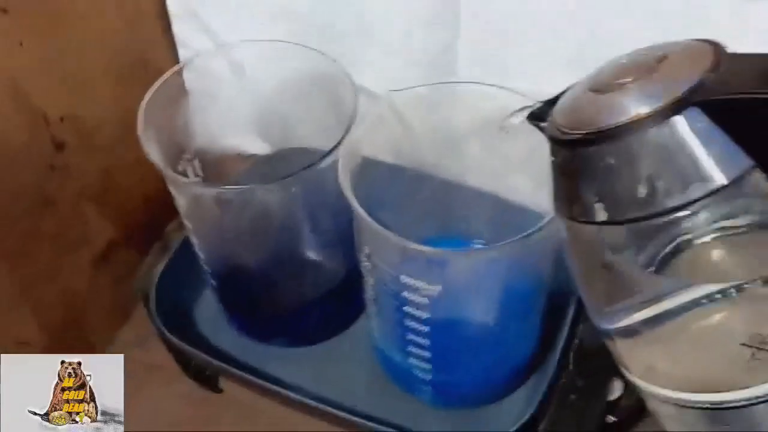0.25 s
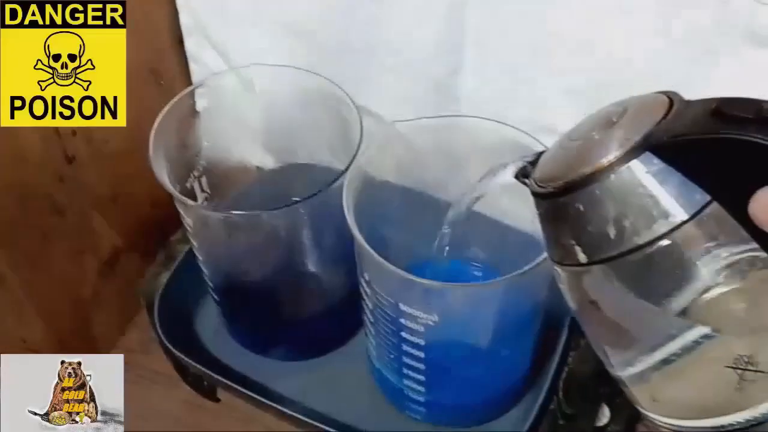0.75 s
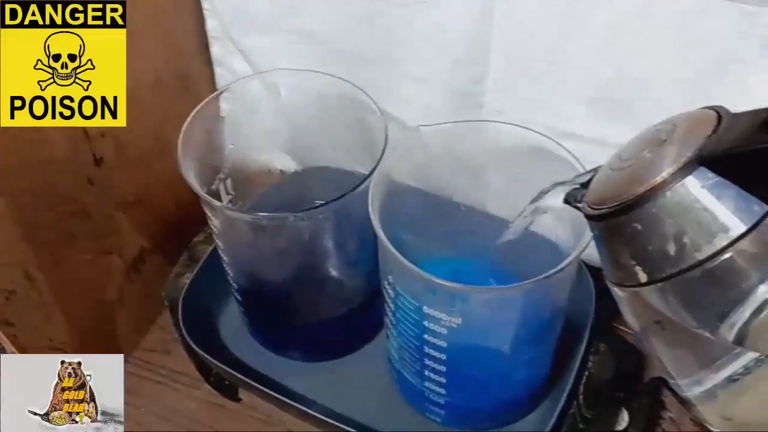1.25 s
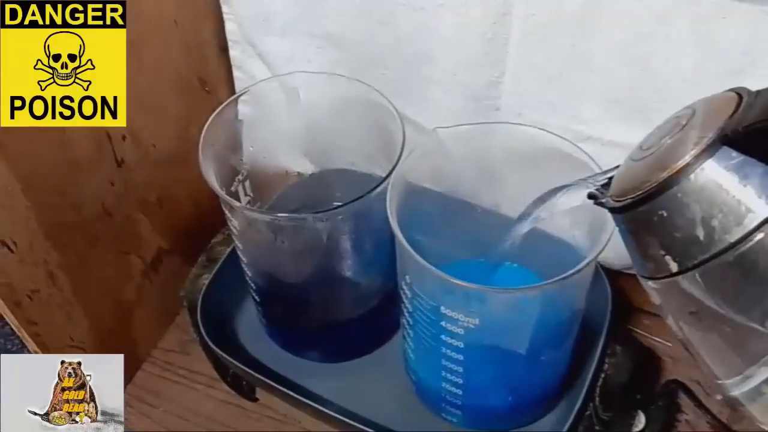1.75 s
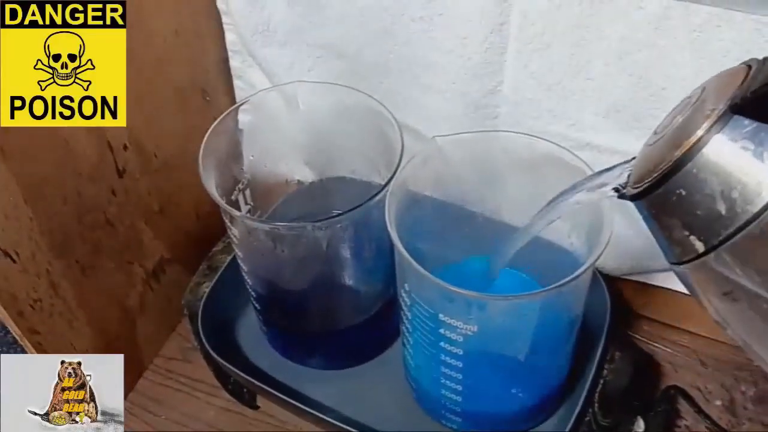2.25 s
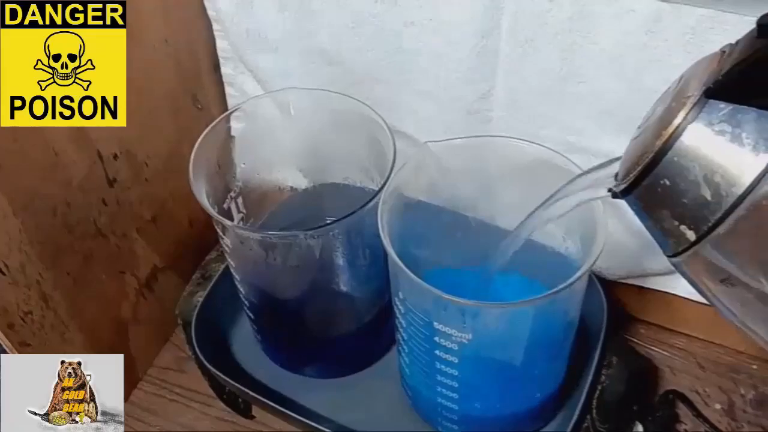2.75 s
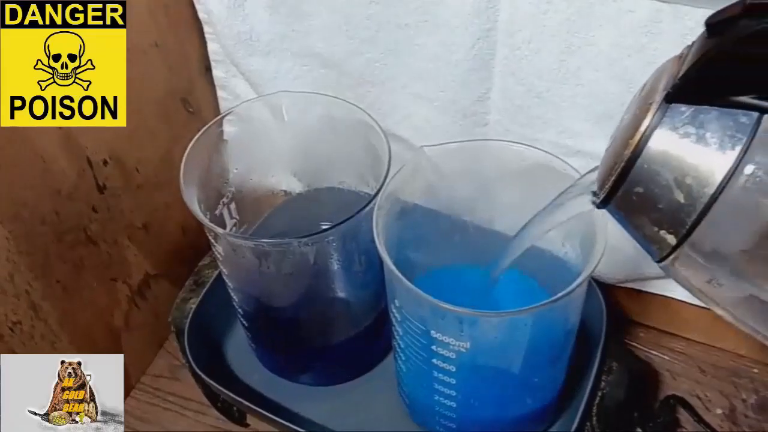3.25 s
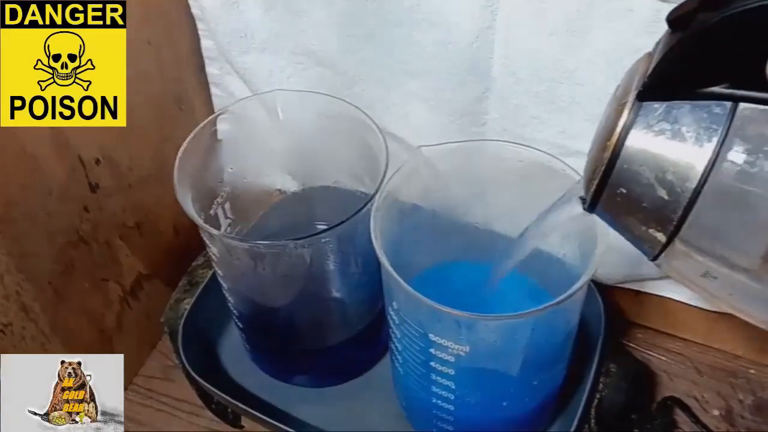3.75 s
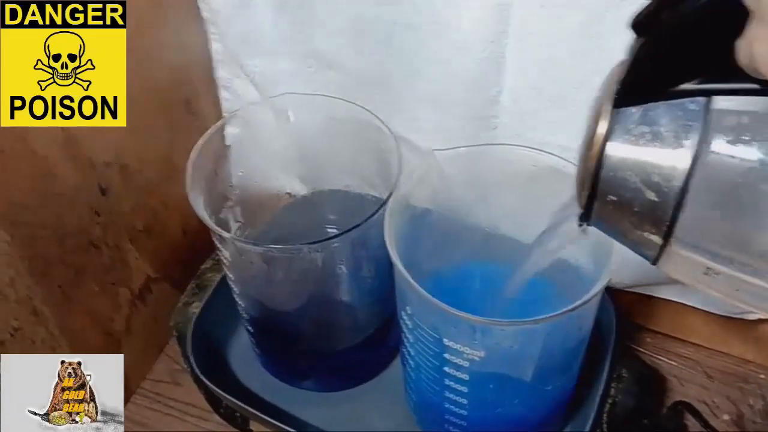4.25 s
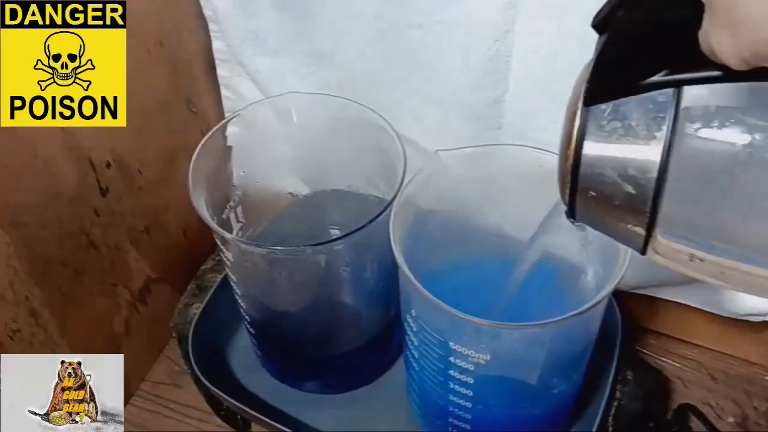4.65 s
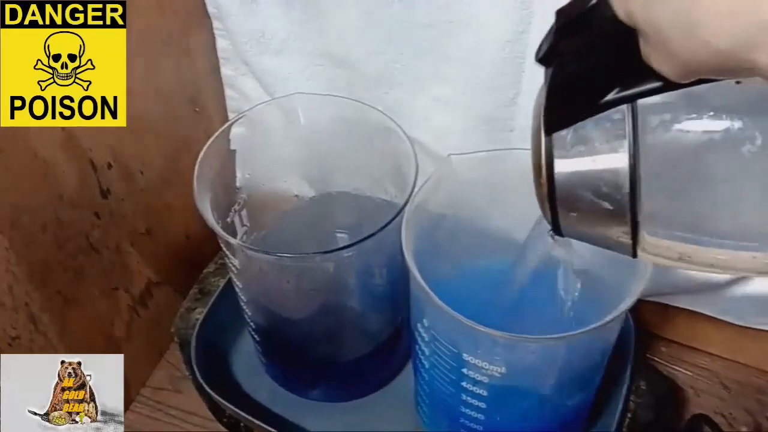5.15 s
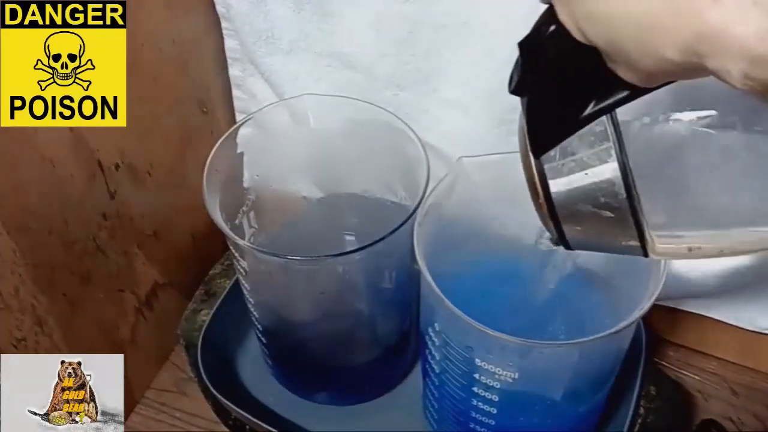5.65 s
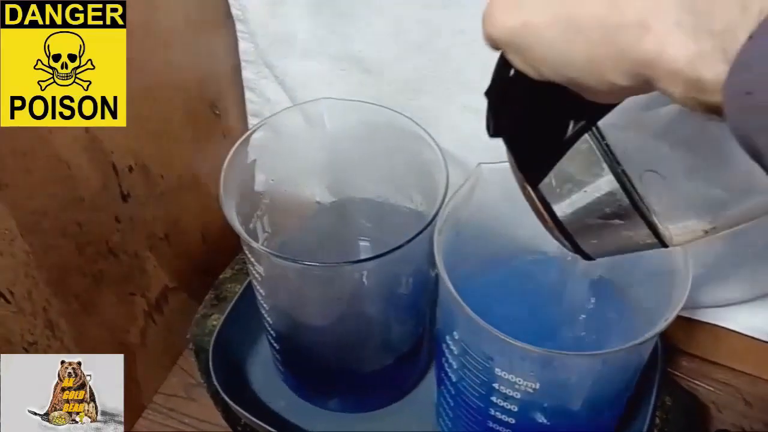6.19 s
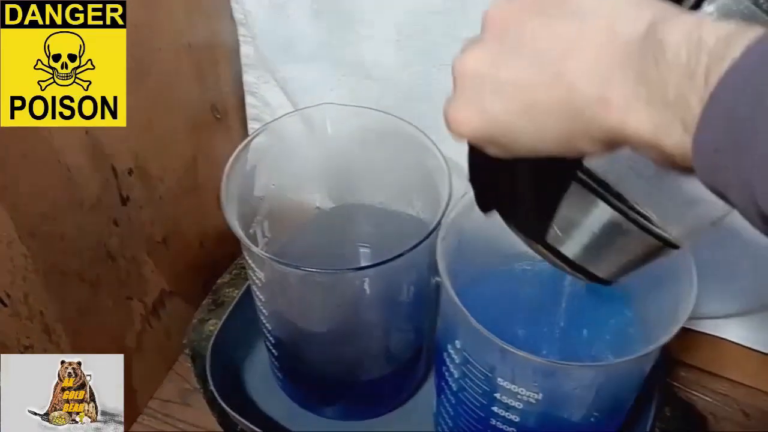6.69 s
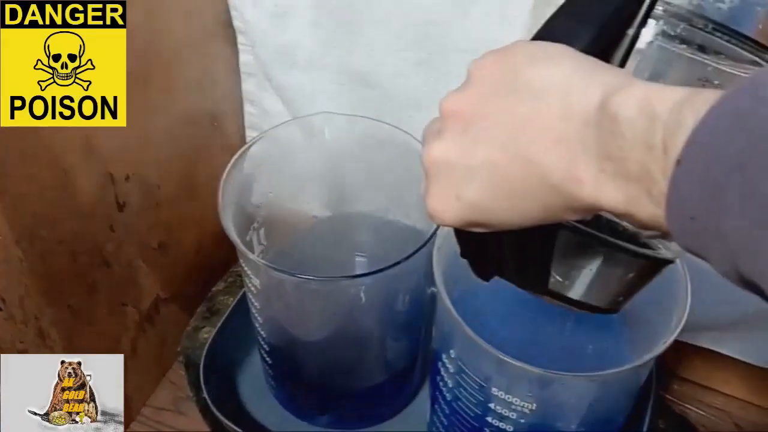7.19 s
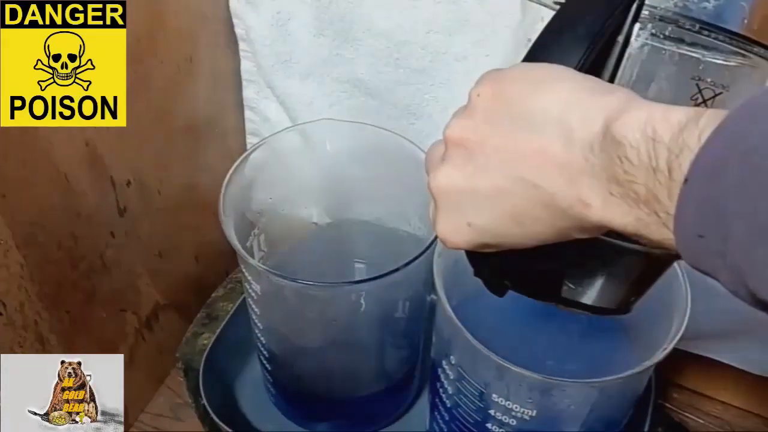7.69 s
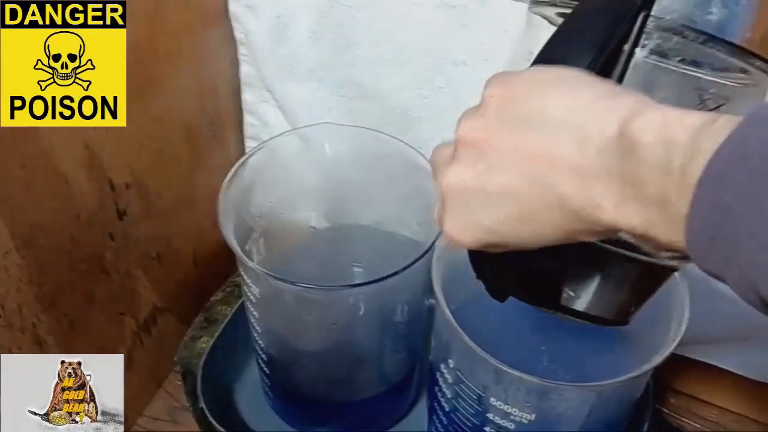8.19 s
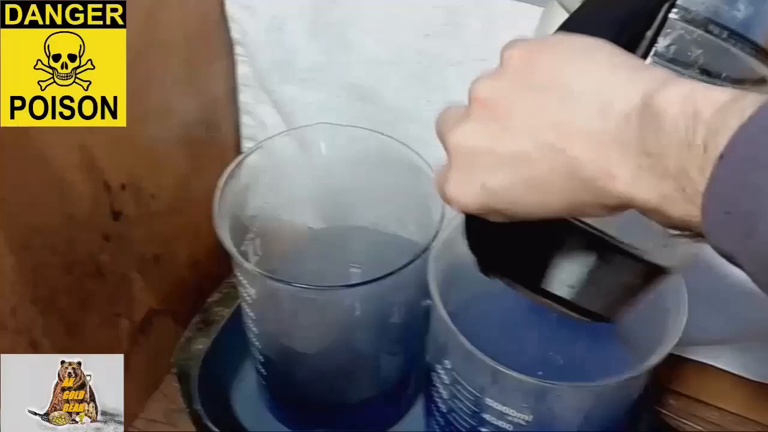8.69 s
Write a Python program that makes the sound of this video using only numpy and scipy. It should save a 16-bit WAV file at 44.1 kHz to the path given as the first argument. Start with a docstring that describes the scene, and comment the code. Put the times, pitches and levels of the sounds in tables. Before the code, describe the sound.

A quiet, soft room hush opens the scene, heard closely in stereo. From about 0.55 seconds a thread of water and several drops slap and ping in a plastic beaker. Near 1.0 the main stream lands with a stronger splash and gulp, then settles into fine crackle, bubbling and low gurgling. At 1.4 a loud, hard kettle clack rattles and rings, with a deep table boom. The pour continues, swelling around 2.8 and 4.5, its hollow resonance gradually rising. A duller double knock strikes at 4.6. Gulps and bright drops crowd together around 6.0 to 6.6; from 6.9 the flow thins quickly into drips and fading fizz. At 7.35 a heavy clack leaves singing steel and a faint wavering hum. A softer, duller knock follows at 8.3, then two extremely faint, thin squeaks around 8.4 to 8.7 over room hush.

```python
"""Pouring hot water into a beaker

Hot water is poured from an electric kettle into a large, part-filled plastic beaker on a tray on a wooden table.
Drops slap and ping first; then the stream crackles, bubbles and gulps, and thins out into a few last drips.
The air above the water is a pair of resonances that climb in pitch as the beaker fills.
The kettle knocks four times: noise rattles its body, its steel rings, and the table booms under it.
Thin squeaks come last. All is heard in a small room by a close pair of microphone ports."""
import sys
import numpy as np
from scipy import signal
from scipy.fft import rfft, irfft
from scipy.io import wavfile

SR = 44100
rng = np.random.default_rng(int(sys.argv[2]) if len(sys.argv) > 2 else 0)


def master_out(mix):
    """Clip the mix to full scale and print it as 16-bit PCM to the path in sys.argv[1]."""
    frames = np.transpose(np.atleast_2d(mix))
    ceiling = np.clip(frames, -1, 1)
    pcm = np.round(ceiling * 32767).astype(np.int16)
    wavfile.write(sys.argv[1], SR, pcm)


N = 393813  # length in samples

# Background sound of the room. Each row: frequency in Hz, relative level in dB.
ROOM_TONE_SPECTRUM = [(25, 0.5), (90, 4.5), (230, -10.5), (520, -13.5), (900, -10), (1500, -13.5),
                      (2000, -20), (3000, -33), (5000, -41), (8500, -49.5), (9500, -42), (10500, -52)]
ROOM_TONE_DB = -57.5

# A thread of water slips over the spout before the pour.
DRIBBLE_START_S, DRIBBLE_DB, DRIBBLE_S = 0.54, -58, 0.34

# Tone of the fine spray. Each row: frequency in Hz, relative level in dB.
SPRAY_SPECTRUM = [(1290, -41), (2200, -3), (2940, -6.5), (3560, -1), (4000, -4.5), (5670, -2.5),
                  (9100, -6.5), (10700, -16), (13900, 0), (16000, -10)]
# Tone of the bursting bubbles. Each row: frequency in Hz, relative level in dB.
BUBBLING_SPECTRUM = [(500, -22), (750, -5), (1200, 1), (2300, 2), (2900, 8.5), (4000, -22.5), (7000, -38.5)]
SPRAY_DB, BUBBLING_DB, FOAM_DB = 1, -7, -6  # against the flow

# Drops slapping the surface.
# Each row: start in seconds, level in dB, starting pitch of the ping in Hz, level of the fine spatter in dB.
DROP_HITS = [(0.566, -48, 6500, -53), (0.613, -23, 2570, -28), (0.626, -25, 2520, -33),
             (0.698, -22, 2670, -48), (0.719, -21, 5960, -55), (0.8998, -33.5, 5320, -39.5),
             (1.578, -20.5, 6700, -36), (2.461, -25.5, 4350, -36), (3.0517, -36, 5370, -31),
             (3.3437, -19.5, 9100, -34), (3.758, -24, 3440, -53), (4.074, -25.5, 2950, -52),
             (5.231, -20, 6040, -42), (5.605, -22, 4960, -21), (6.0594, -22, 3580, -53),
             (6.0997, -30, 8900, -35), (6.1397, -19, 6240, -53), (6.181, -21.5, 3570, -54),
             (6.2839, -15, 3640, -41.5), (6.3001, -17.5, 6600, -28), (6.5425, -24, 8800, -31),
             (6.6063, -29, 9000, -20), (6.9085, -38.5, 8850, -28), (6.935, -29.5, 6160, -17.5),
             (7.1653, -42, 8300, -34), (7.292, -33, 9350, -28.5), (7.5822, -28.5, 9200, -40)]
# Single ringing bubbles, from small pings to deep plops.
# Each row: start in seconds, level in dB, starting pitch in Hz.
SINGLE_BUBBLES = [(0.605, -29, 2680), (0.6742, -21.5, 2580), (0.9798, -24, 190), (0.995, -25.5, 800),
                  (1.054, -33.5, 1130), (1.14, -31, 380), (1.242, -37.5, 1080), (1.659, -31, 1200),
                  (1.826, -29.5, 1110), (2.362, -23.5, 1820), (2.793, -25, 1290), (2.816, -26.5, 1390),
                  (3.8306, -23, 2320), (4.119, -31, 1400), (4.8457, -27.5, 1240), (5.934, -31.5, 1870),
                  (6.209, -27.5, 1360), (6.287, -29.5, 370), (6.4998, -18, 2600), (6.56, -24.5, 1290),
                  (6.759, -28, 1440), (6.937, -35, 1490), (7.093, -29, 1380), (7.097, -43.5, 524),
                  (7.238, -33, 1320), (7.261, -29.5, 760), (8.048, -48, 930)]

# Tone of the foam. Each row: frequency in Hz, relative level in dB.
FOAM_SPECTRUM = [(1500, -41), (2800, -30), (7800, 3), (9500, 8), (10800, -4), (15000, 8.5)]
FOAM_LAG_S, FOAM_DIES_DB_PER_S = 0.41, 24.5  # foam follows the jet late and outlasts it
DROP_FIZZ_DB, DROP_FIZZ_S = -60, 0.066  # fizz left by a drop: level against the drop, fall time

# Ringing wall of the beaker. Each row: frequency in Hz, width in Hz, relative level in dB.
BEAKER_WALL = [(511, 35, -5.5), (2580, 21, -2), (2670, 250, -9.5), (3630, 470, -8)]
# Air column above the water.
# Each row: time in seconds, first resonance in Hz, second resonance in Hz, both before the slosh.
AIR_RESONANCES = [(.6, 335, 1020), (2.3, 375, 1150), (3, 400, 1280), (4.3, 432, 1370), (6, 495, 1430),
                  (7.2, 515, 1500)]
SLOSH, SLOSH_PER_S = .032, 14  # the churning surface shifts the air's pitch by about this share
WANDER_PER_S = 25  # how often the mix of close echoes shifts

# Strength of the steady jet. Each row: time in seconds, level in dB.
JET_LEVEL = [(1.15, -57.5), (1.47, -54), (2.34, -52.5), (2.77, -45), (4.16, -50.5), (4.52, -45.5),
             (5.7, -49), (6.48, -49.5), (6.9, -53.5)]
POUR_START_S = .977
FIRST_SPLASH_DB, FIRST_SPLASH_S = 13.5, 0.22  # extra level as the jet arrives, and how fast it settles
DRAIN_DB_PER_S = 43  # after the last row the stream thins to nothing

# Gulps of air dragged under. Each row: start in seconds, thud level in dB, gurgle level in dB.
AIR_GULPS = [(0.978, -25, -35), (1.141, -35, -30.5), (1.665, -34.5, -36.5), (2.458, -36.5, -60),
             (2.862, -28.5, -32), (3.026, -44, -41), (3.153, -38, -56), (3.334, -28, -63),
             (3.407, -30.5, -37), (3.826, -29, -31.5), (4.295, -34, -26.5), (4.501, -27.5, -36),
             (4.88, -25, -39), (5.237, -32, -24.5), (5.305, -34, -28), (5.534, -50, -32.5),
             (6.035, -40, -34), (6.278, -23.5, -27), (6.441, -22, -23.5), (6.51, -29, -38),
             (6.555, -52, -22.5), (6.717, -28.5, -34.5)]
# Tone of the gurgle. Each row: frequency in Hz, relative level in dB.
GURGLE_SPECTRUM = [(150, -7.5), (260, -3.5), (380, 5), (560, 3), (800, -2), (1800, -15)]

# The kettle's clacks. Each row: moment of the peak in seconds, level in dB, rise time in seconds,
# brightness cutoff in Hz, long ring against the clack in dB, level of the hum in dB.
KETTLE_CLACKS = [(1.398, -6.5, 0.0056, 4180, -1.5, -36), (4.61, -9, 0.0046, 3020, -30, -55),
                 (4.634, -11, 0.0014, 1400, -13, -63), (7.349, -6, 0.0054, 3060, 10, -28.5),
                 (8.327, -15, 0.0043, 1790, -11, -42.5)]
# Resonances of the kettle body. Each row: frequency in Hz, width in Hz, relative level in dB.
KETTLE_BODY = [(230, 66, -14), (350, 46, -4), (556, 44, -1.5), (731, 41, 1.5), (784, 110, 4), (959, 32, 6),
               (1175, 36, -2.5), (1366, 92, 1), (1590, 250, -3.5), (1911, 76, -3.5), (2170, 26, -3.5),
               (2270, 28, -3.5), (2520, 31, -6), (3440, 170, -9.5), (6500, 1300, -14.5)]

# Blows reaching the table. Each row: start in seconds, level in dB, contact time in seconds,
# lead of the first light touch in seconds.
TABLE_BLOWS = [(1.391, 0, 0.0009, 0.013), (4.602, 1, 0.0013, 0.00091), (4.661, -1, 0.0013, 0.015),
               (4.678, -1, 0.0014, 0.014), (7.345, -2, 0.0011, 0.012), (7.462, -13, 0.0019, 0.0066),
               (8.324, -3.5, 0.0018, 0.013)]
# Resonances of table and tray. Each row: frequency in Hz, width in Hz, relative level in dB.
TABLE_MODES = [(38.3, 7.9, -0.5), (53.5, 9.1, -7), (74.8, 5.5, 11), (94, 7.2, 5), (112, 22, 4.5),
               (154, 16, -7.5), (253.4, 56, -7), (360, 35, -9.5)]
TOUCH_DB, TOUCH_S = -15, 0.0037  # the touch is weaker and softer than the blow

# Long ring of the kettle's steel.
# Each row: frequency in Hz, relative level in dB, time to fall by 60 dB in seconds.
STEEL_MODES = [(705, -6, 0.27), (748, -4, 0.19), (985, 1, 0.38), (1523, -1, 0.62), (1750, -10, 0.65),
               (1803, -14, 0.75), (1884, 3, 0.42), (1992, -8, 0.85), (2207, -15, 0.35), (2579, -2, 0.3),
               (2676, -13, 0.22), (2961, -10, 0.32), (3391, -10, 0.19)]
# The wall is not quite round: each mode has a weaker twin up to this share away, and beats.
TWIN_SPLIT, TWIN_DB = .012, -10

HUM_HZ, HUM_SWELLS_PER_S, HUM_T60_S = 281, 2.93, 1.5  # low wavering ring after a clack

# Thin squeaks as the kettle is tilted.
# Each row: start in seconds, length in seconds, starting pitch in Hz, fall of pitch in Hz, level in dB.
KETTLE_SQUEAKS = [(8.406, 0.12, 4700, 159, -80), (8.532, 0.17, 4570, 30, -73.5)]

# Tone of the left microphone port. Each row: frequency in Hz, gain in dB.
LEFT_PORT_TONE = [(60, 3.5), (550, 5.5), (1300, 2.5), (4400, 2), (7500, 4), (9000, -3), (11000, -19.5),
                  (15000, -19.5)]
# Tone of the right microphone port. Each row: frequency in Hz, gain in dB.
RIGHT_PORT_TONE = [(60, -2.5), (350, -2), (650, 0), (1300, 3), (7500, 5.5), (9000, 10), (15000, -5)]
PORT_LAG_S = 39 / SR  # how late the left port is
CUTOFF_HZ = 16200


def from_db(db):
    """Turn decibels into a gain."""
    return 10 ** (np.asarray(db) / 20)


def rms_one(x):
    """Scale a sound to an average (rms) strength of 1."""
    return x / np.sqrt(np.mean(x ** 2) + 1e-20)


def in_time(rows):
    """Draw straight lines between the rows of a curve, one value per sample."""
    s, *columns = np.transpose(rows)
    return [np.interp(np.arange(N) / SR, s, c) for c in columns]


def add(track, s, sound):
    """Mix a sound into a track at a time in seconds."""
    at = max(round(s * SR), 0)
    track[at:at + len(sound)] += sound[:N - at]


def seconds(length):
    """Make a time axis from zero."""
    return np.arange(int(length * SR)) / SR


def low_pass(x, hz, order=2):
    """Dull a sound above a frequency (Butterworth filter)."""
    return signal.sosfilt(signal.butter(order, min(hz, .45 * SR), fs=SR, output="sos"), x)


def colour(x, points, size=4096):
    """Give a sound the tone of a table, with a filter that responds at once (minimum phase)."""
    hz, db = np.transpose(points)
    grid = np.maximum(np.arange(size // 2 + 1) * SR / size, 1)
    gain = from_db(np.interp(np.log(grid), np.log(hz), db))
    cepstrum = irfft(np.log(gain))
    cepstrum[1:size // 2] *= 2  # fold the second half onto the first, so nothing sounds early
    response = irfft(np.exp(rfft(cepstrum[:size // 2], size)))
    return signal.oaconvolve(x, response)[:N]


def drift(rate):
    """Wander by chance: random points, this many a second, joined by straight lines."""
    knots = rng.standard_normal(4000)
    return np.interp(np.arange(N) / SR * rate, np.arange(len(knots)), knots)


def resonance(hz, width_hz):
    """Filter numbers of one resonance with gain 1 on top."""
    r = np.exp(-np.pi * width_hz / SR)
    return (1 - r * r) / 2 * np.array([1, 0, -1]), [1, -2 * r * np.cos(2 * np.pi * hz / SR), r * r]


def resonate(x, modes):
    """An object rings at several resonances side by side."""
    return sum(from_db(db) * signal.lfilter(*resonance(hz, width), x + 1e-18) for hz, width, db in modes)


def swell(t, rise_s, fall_s):
    """A quick rise and an exponential fall, peak 1."""
    shape = (1 - np.exp(-t / rise_s)) ** 2 * np.exp(-t / fall_s)
    return shape / shape.max()


def room_tone():
    """Soft coloured noise, nearly separate in the two ports."""
    hush = np.array([rms_one(colour(white, ROOM_TONE_SPECTRUM)) for white in rng.standard_normal((2, N))])
    return from_db(ROOM_TONE_DB) * (hush + 0.033 * hush[::-1])


def dribble():
    """Gain of the first thread of water: it swells and breaks off."""
    out = np.zeros(N)
    add(out, DRIBBLE_START_S, from_db(DRIBBLE_DB) * np.sin(np.pi * seconds(DRIBBLE_S) / DRIBBLE_S))
    return out


def grains(per_s, low_hz, high_hz, q, spread_db, clump_db, count=28):
    """Bubbles of many sizes are born, in clumps of strength; each rings briefly at its own pitch."""
    born = np.flatnonzero(rng.random(N) < per_s / SR)
    size_db = spread_db * np.minimum(rng.exponential(1, N), 4) + clump_db * drift(110)
    sizes = from_db(size_db) * rng.choice([-1, 1], N)
    pitch_number = rng.integers(0, count, N)
    out = np.zeros(N)
    for k, hz in enumerate(np.geomspace(low_hz, min(high_hz, .45 * SR), count)):
        mine = born[pitch_number[born] == k]
        clicks = np.full(N, 1e-18)
        clicks[mine] = sizes[mine]
        out += signal.lfilter(*resonance(hz, hz / q), clicks)
    return out


def splashes(per_s, spread_db):
    """Droplets thrown up by the jet fall back in short, uneven spits."""
    sizes = (rng.random(N) < per_s / SR) * from_db(spread_db * np.minimum(rng.exponential(1, N), 2.5))
    strength = signal.oaconvolve(sizes, swell(seconds(.02), 0.00088, 0.0013))[:N]
    return rms_one(strength * rng.standard_normal(N))


def bubble(hz, cycles, rise):
    """A fading sine whose pitch climbs as the bubble nears the surface."""
    age = seconds(6 * cycles / hz) * hz / cycles  # 1 when it has faded to about a third
    tone = np.sin(2 * np.pi * cycles * (age + rise * age ** 2 / 2))
    return tone * np.exp(-age) * (1 - np.exp(-5 * age))


def bubbles(per_s, low_hz, high_hz, cycles, rise, spread_db):
    """Air carried under by the jet: bubbles of every size, each with its own life and glide."""
    out, draws = np.zeros(N), rng.random((20000, 4))
    for when, size, strength, life in draws[:int(per_s * N / SR)]:
        gain = from_db(spread_db * min(-np.log(strength), 2.5))
        hz = low_hz * (high_hz / low_hz) ** size
        add(out, when * N / SR, gain * bubble(hz, cycles * (.5 + life), rise * 2 * life))
    return out


def stream(jet):
    """Tiny bubbles crackle over a fine hiss where the jet lands; larger ones burst in a choppy splash."""
    crackle = rms_one(grains(3000, 1820, 15100, q=5.5, spread_db=8.0, clump_db=4.5))
    spits = from_db(-2) * splashes(per_s=45, spread_db=5)
    hiss = from_db(-8.0) * rng.standard_normal(N)
    spray = colour(crackle + spits + hiss, SPRAY_SPECTRUM)
    burble = rms_one(bubbles(1400, 600, 4200, cycles=3.2, rise=0.012, spread_db=5))
    burble = burble + from_db(-4) * splashes(per_s=80, spread_db=5)
    burble = colour(burble, BUBBLING_SPECTRUM) * from_db(3.2 * drift(50))
    return jet * (from_db(SPRAY_DB) * rms_one(spray) + from_db(BUBBLING_DB) * rms_one(burble))


def drops(slap_db, ping_db, puff_db, spatter_db):
    """A drop slaps, spatters, puffs air into the beaker and leaves a tiny pinging bubble."""
    out, t = np.zeros(N), seconds(0.05)
    for s, db, hz, fine_db in DROP_HITS:
        noise = rng.standard_normal((3, len(t)))
        slap = signal.lfilter(*resonance(4800, 4100), noise[0]) * swell(t, 0.0054, 0.00047)
        puff = signal.lfilter(*resonance(910, 430), noise[1]) * swell(t, 0.0016, 0.0097)
        spatter = signal.lfilter(*resonance(6900, 8300), noise[2]) * swell(t, 0.00024, 0.00064)
        add(out, s, from_db(db) * (from_db(slap_db) * slap + from_db(puff_db) * puff))
        add(out, s, from_db(fine_db + spatter_db) * spatter)
        add(out, s, from_db(db + ping_db) * bubble(hz, cycles=9.9, rise=0.039))
    return out


def foam(jet):
    """Foam gathers behind the jet and bursts slowly away; every drop leaves a short fizz too."""
    t = np.arange(N) / SR
    fed = np.interp(t - FOAM_LAG_S, t, jet) * from_db(FOAM_DB)
    dying = from_db(-FOAM_DIES_DB_PER_S * t)
    amount = np.maximum.accumulate(fed / dying) * dying  # follows a rise at once, falls only slowly
    for s, db, *_ in DROP_HITS:
        add(amount, s, from_db(db + DROP_FIZZ_DB) * swell(seconds(.3), .002, DROP_FIZZ_S))
    bursts = rms_one(grains(1200, 2000, 12400, q=16, spread_db=4.0, clump_db=9.0))
    return amount * rms_one(colour(bursts + from_db(-1.5) * rng.standard_normal(N), FOAM_SPECTRUM))


def single_bubbles(bubble_db, splash_db):
    """Large single bubbles ring inside a rough splash of noise around the same pitch."""
    out, t = np.zeros(N), seconds(0.05)
    for s, db, hz in SINGLE_BUBBLES:
        splash = rms_one(signal.lfilter(*resonance(hz, hz), rng.standard_normal(len(t))))
        add(out, s, from_db(db + splash_db) * splash * swell(t, 0.00065, .007))
        add(out, s, from_db(db + bubble_db) * bubble(hz, cycles=4.4, rise=0.013))
    return out


def air_column(x, first_db, second_db, first_width_hz, second_width_hz, size=256):
    """The air in the beaker rings higher as the water rises, and wavers as it sloshes."""
    out = x.copy()
    slosh = 1 + SLOSH * drift(SLOSH_PER_S)
    tracks = in_time(AIR_RESONANCES) * slosh
    for track, db, width in zip(tracks, (first_db, second_db), (first_width_hz, second_width_hz)):
        state = np.zeros(2)
        for i in range(0, N, size):  # a new pitch for every short block
            block, state = signal.lfilter(*resonance(track[i], width), x[i:i + size], zi=state)
            out[i:i + size] += from_db(db) * block
    return out


def room(x, early_db, early_t60, tail_db, tail_t60, wall_hz, count=5):
    """Close echoes change as the source wanders; a duller tail follows, different at each port."""
    t, out = seconds(.6), []
    places = np.array([drift(WANDER_PER_S) for _ in range(count)])
    parts = x * places / np.linalg.norm(places, axis=0)
    for tail, *patterns in rng.standard_normal((2, count + 1, len(t))):
        tail = low_pass(tail, wall_hz, order=1) * from_db(-60 * t / tail_t60) * (t > .008)
        port = x + from_db(tail_db) * signal.oaconvolve(x, tail / np.linalg.norm(tail))[:N]
        for part, early in zip(parts, patterns):
            early = (early * from_db(-60 * t / early_t60) * (t > .001))[t < 2 * early_t60]
            port += from_db(early_db) * signal.oaconvolve(part, early / np.linalg.norm(early))[:N]
        out.append(port)
    return np.array(out)


def flow():
    """Gain of the jet: a first splash, the steady pour, then it drains away."""
    t = np.arange(N) / SR
    age = np.maximum(t - POUR_START_S, 0)
    first_splash = FIRST_SPLASH_DB * np.exp(-age / FIRST_SPLASH_S)
    drained = DRAIN_DB_PER_S * np.maximum(t - JET_LEVEL[-1][0], 0)
    return from_db(in_time(JET_LEVEL)[0] + first_splash - drained) * (age > 0)


def glugging(jet, level_db):
    """The plunging jet keeps up a low, lumpy gurgle of big bubbles deep in the water."""
    deep = bubbles(600, 190, 560, cycles=3.2, rise=0.03, spread_db=3)
    return from_db(level_db) * jet * rms_one(deep)


def gulps(jet):
    """Pockets of air gurgle in the beaker and shake the tray; the jet adds a little steady shaking."""
    thud, gurgle, t = jet * from_db(-9.5), np.zeros(N), seconds(0.36)
    for s, thud_db, gurgle_db in AIR_GULPS:
        add(thud, s, from_db(thud_db - 9.0) * swell(t, 0.00096, 0.041))
        add(gurgle, s, from_db(gurgle_db - 11.0) * swell(t, 0.0005, 0.029))
    churn = bubbles(1200, 175.0, 1200, cycles=1.84, rise=0.018, spread_db=-0.5)
    churn = rms_one(colour(churn, GURGLE_SPECTRUM))
    shake = resonate(thud * rng.standard_normal(N), [(89.0, 36.6, 0), (132.0, 15, 0)])
    shake = colour(shake, [(25, -14.0), (70, 4.0), (190, -5.0), (400, -24.0), (1200, -22)])
    return gurgle * churn, from_db(29.0) * shake


def kettle(rattle_db, crack_db, fall_s):
    """Each clack is a rattle of contacts that builds and dies in the body."""
    contacts, lead = np.zeros(N), .025
    t = seconds(.15) - lead  # zero at the peak
    for s, db, rise_s, bright_hz, *_ in KETTLE_CLACKS:
        rattle = rng.standard_normal(len(t)) * np.exp(np.minimum(t / rise_s, -t / fall_s))
        add(contacts, s - lead, from_db(db) * low_pass(rattle, bright_hz, order=1))
    return from_db(rattle_db) * resonate(contacts, KETTLE_BODY) + from_db(crack_db) * low_pass(contacts, 4700)


def table(boom_db, shudder_db, shudder_s):
    """A light touch, then the full push sets the table booming; the things on it shudder for a while."""
    force, t = np.zeros(N), seconds(.7)
    for s, db, contact_s, lead_s in TABLE_BLOWS:
        touch, push = (np.sin(np.pi * np.minimum(t / length, 1)) for length in (TOUCH_S, contact_s))
        shudder = rng.standard_normal(len(t)) * swell(t, 0.0014, shudder_s)
        add(force, s - lead_s, from_db(db + TOUCH_DB) * touch)
        add(force, s, from_db(db) * (push + from_db(shudder_db) * shudder))
    return from_db(boom_db) * low_pass(resonate(force, TABLE_MODES), 470)


def steel(level_db):
    """The kettle's steel sings on after each clack, in close pairs of modes that beat."""
    out, t = np.zeros((2, N)), seconds(0.7)
    ring = np.zeros(len(t))
    for hz, db, t60 in STEEL_MODES:
        twin_hz = hz * (1 + TWIN_SPLIT * (2 * rng.random() - 1))
        pair = np.sin(2 * np.pi * hz * t) + from_db(TWIN_DB) * np.sin(2 * np.pi * twin_hz * t)
        ring += from_db(db - 60 * t / t60) * pair
    for s, db, _, _, ring_db, _ in KETTLE_CLACKS:
        for port, lead_s in zip(out, (PORT_LAG_S, 0)):  # early on the left, to cancel that port's lag
            add(port, s - lead_s, from_db(level_db + db + ring_db) * ring)
    return out


def hum():
    """Each clack leaves a low ring that swells and sinks as it dies."""
    out, t = np.zeros(N), seconds(HUM_T60_S)
    swells = np.sin(np.pi * HUM_SWELLS_PER_S * t) ** 2
    ring = np.sin(2 * np.pi * HUM_HZ * t) * swells * from_db(-60 * t / HUM_T60_S)
    for s, *_, hum_db in KETTLE_CLACKS:
        add(out, s, from_db(hum_db) * ring)
    return out * from_db(0.83 * drift(40))


def squeaks():
    """Thin tones that swell, sag in pitch and fade."""
    out = np.zeros(N)
    for s, length, hz, fall_hz, db in KETTLE_SQUEAKS:
        t = seconds(length)
        tone = np.sin(2 * np.pi * t * (hz - fall_hz * t / length / 2))
        add(out, s, from_db(db) * np.sin(np.pi * t / length) * tone)
    return out


def scene():
    """Water and kettle sound into the room; the table's bass reaches both ports alike."""
    jet = flow()
    gurgle, thud = gulps(jet)
    water = stream(jet + dribble()) + foam(jet) + from_db(-11) * gurgle
    water += drops(slap_db=-6.5, ping_db=-6.0, puff_db=-14.0, spatter_db=2)
    water += single_bubbles(bubble_db=-4, splash_db=-17.5)
    water = water + resonate(water, BEAKER_WALL) + glugging(jet, level_db=-13)
    water = air_column(water, first_db=15.5, second_db=4, first_width_hz=48, second_width_hz=200)
    water = room(water + from_db(-4.5) * gurgle, early_db=1.0, early_t60=0.029,
                 tail_db=-11.5, tail_t60=0.25, wall_hz=6100)
    knocks = room(kettle(rattle_db=4.0, crack_db=-13.5, fall_s=0.011), early_db=-2.0, early_t60=0.063,
                  tail_db=-14.0, tail_t60=0.24, wall_hz=588)
    boom = table(boom_db=1.5, shudder_db=-3.5, shudder_s=0.07)
    return water + knocks + steel(level_db=-38) + thud + boom + hum() + squeaks() + room_tone()


def record(dry):
    """Loud peaks are rounded; the left port is fuller, duller and late below the treble; the top is cut."""
    left, right = .6 * np.tanh(dry / .6)
    hz = np.arange(N + 1) * SR / (2 * N)
    lag = PORT_LAG_S / (1 + (hz / 5000) ** 40)  # vanishes above 5000 Hz
    left = irfft(rfft(left, 2 * N) * np.exp(-2j * np.pi * hz * lag))[:N]
    ports = np.array([colour(left, LEFT_PORT_TONE), colour(right, RIGHT_PORT_TONE)])
    return signal.sosfilt(signal.ellip(10, .3, 90, CUTOFF_HZ, fs=SR, output="sos"), ports)


dry = scene()
out = record(dry)
master_out(out)
```